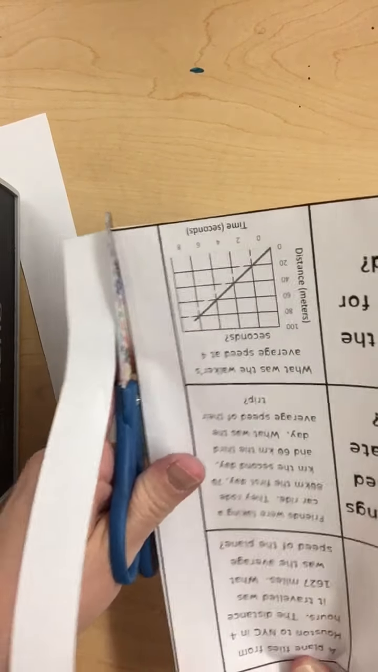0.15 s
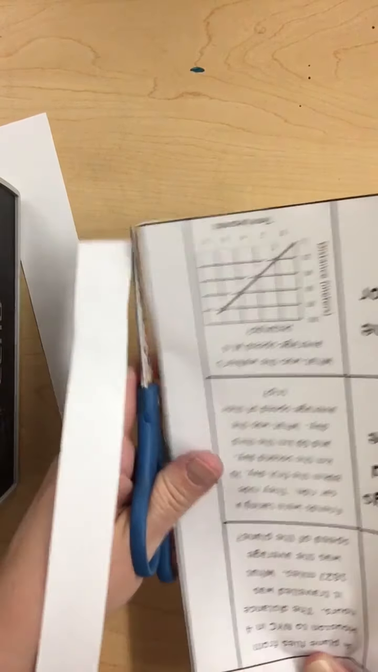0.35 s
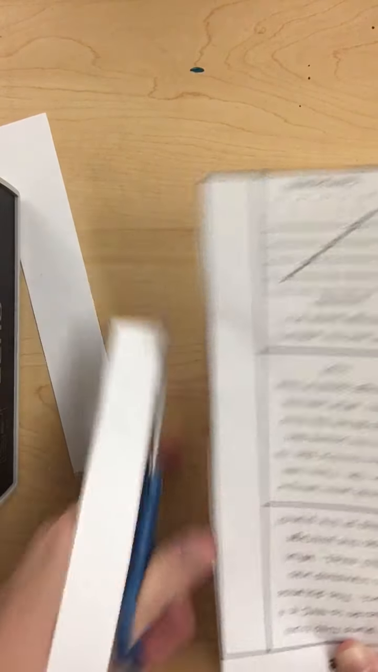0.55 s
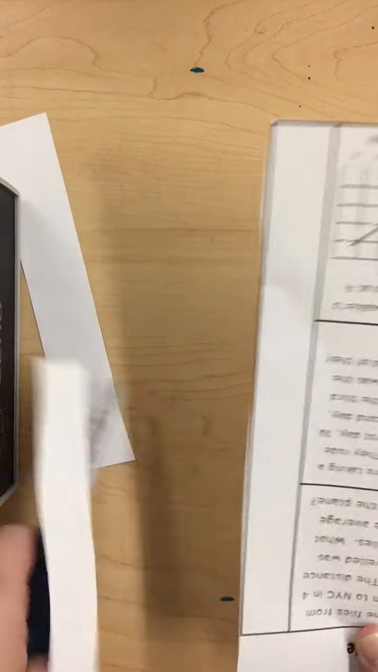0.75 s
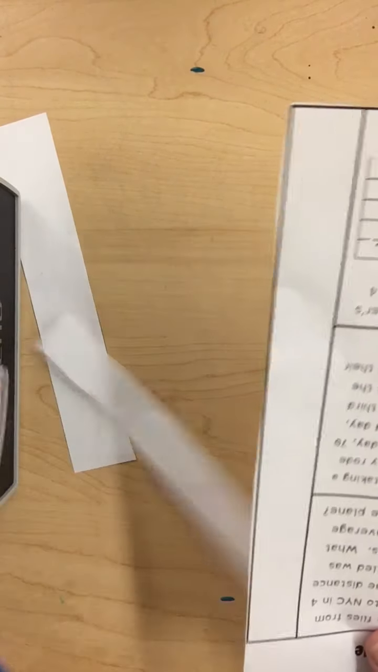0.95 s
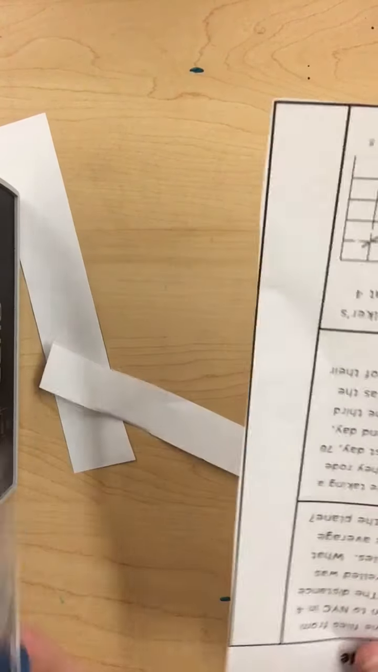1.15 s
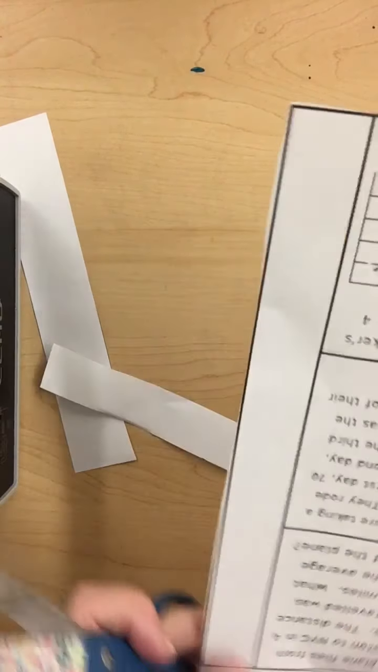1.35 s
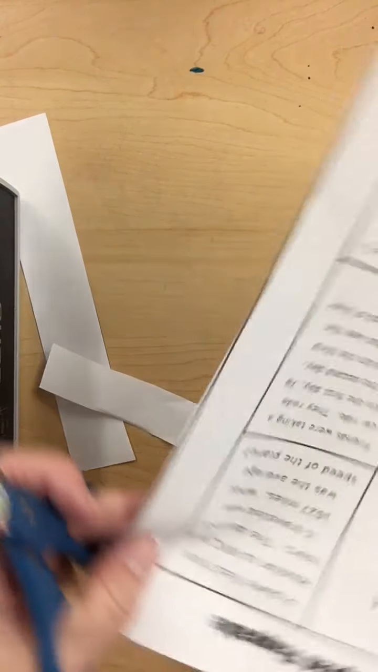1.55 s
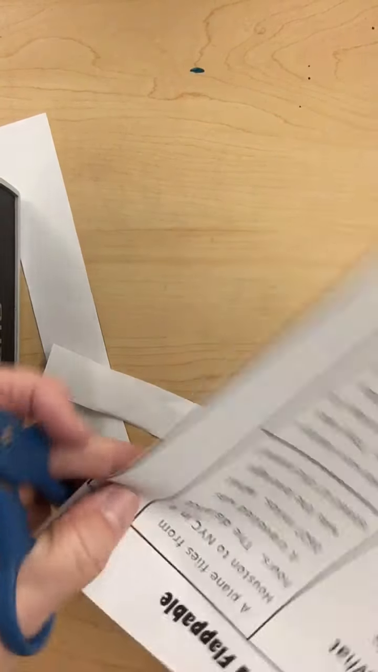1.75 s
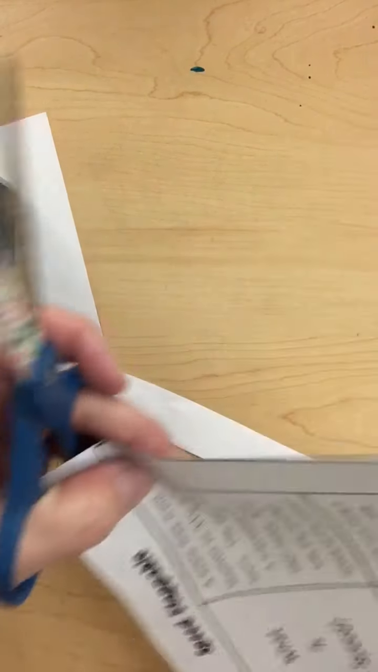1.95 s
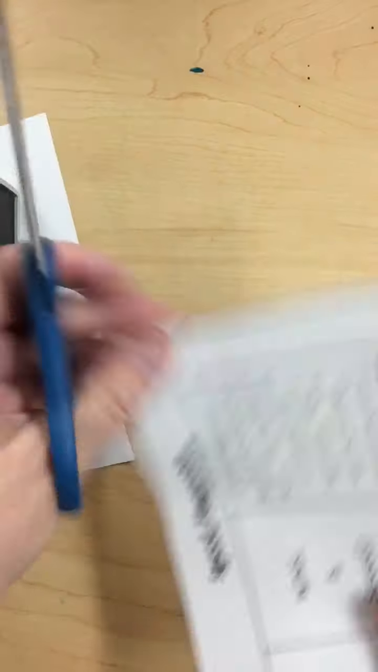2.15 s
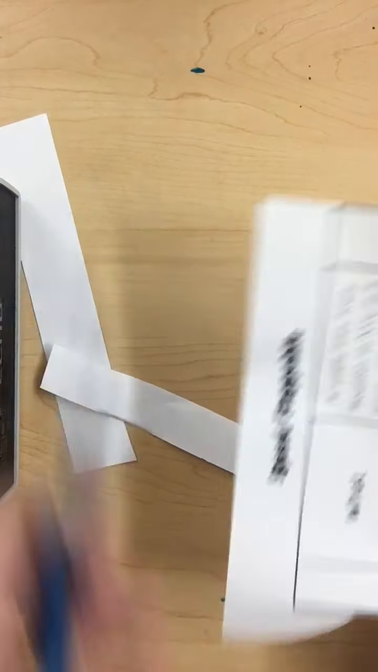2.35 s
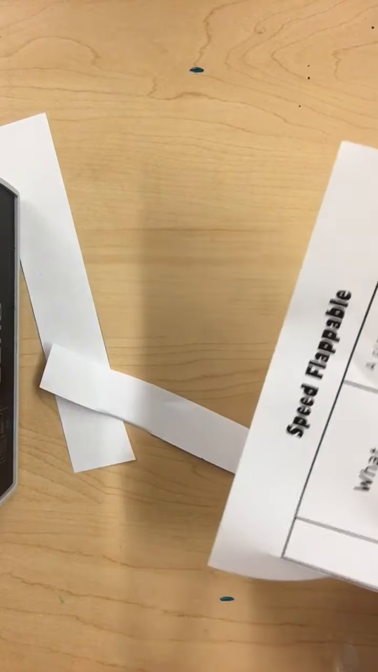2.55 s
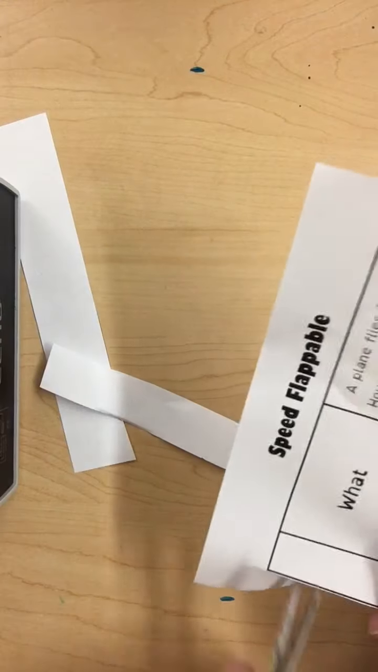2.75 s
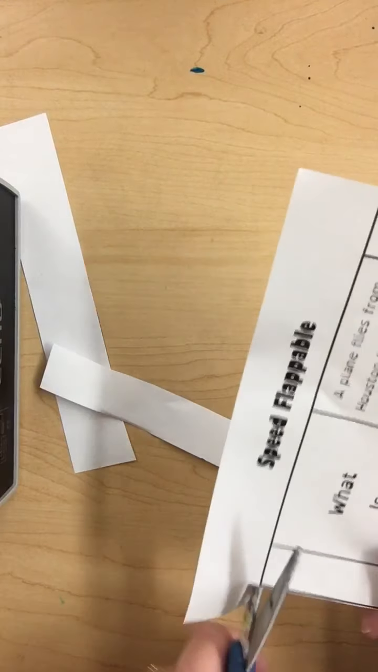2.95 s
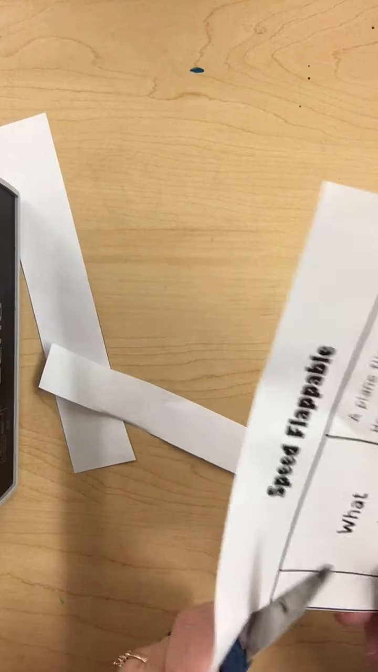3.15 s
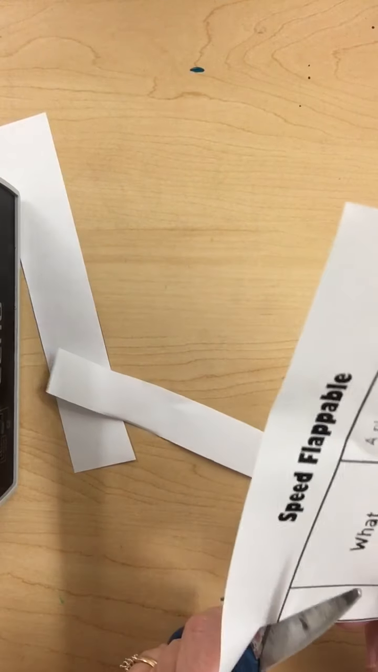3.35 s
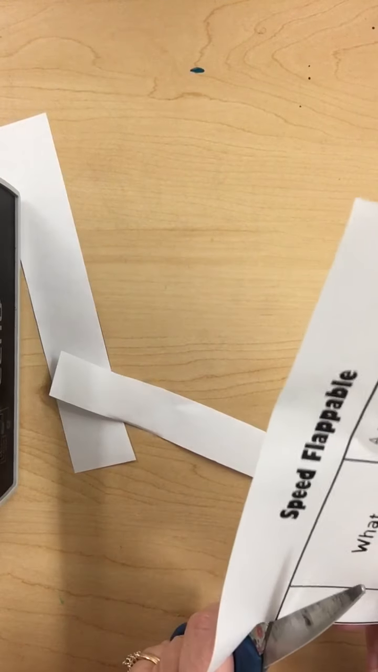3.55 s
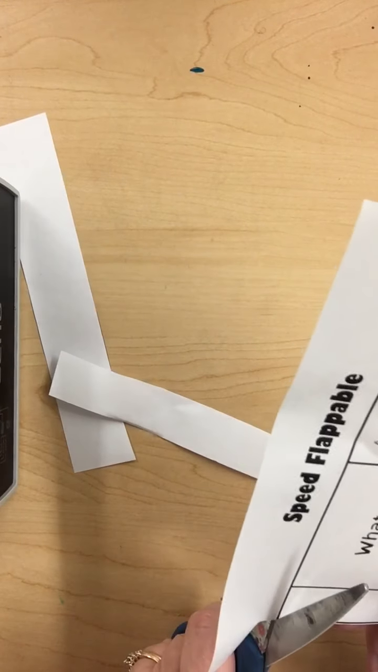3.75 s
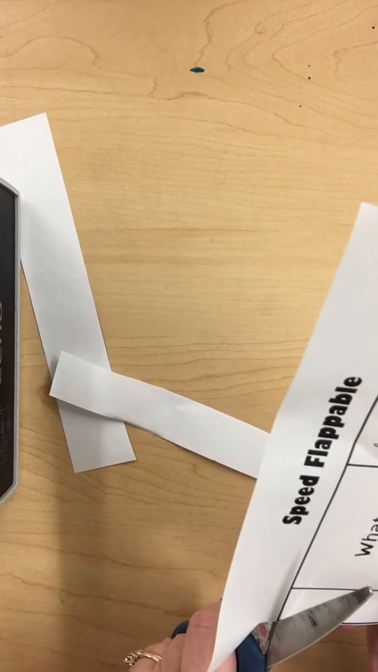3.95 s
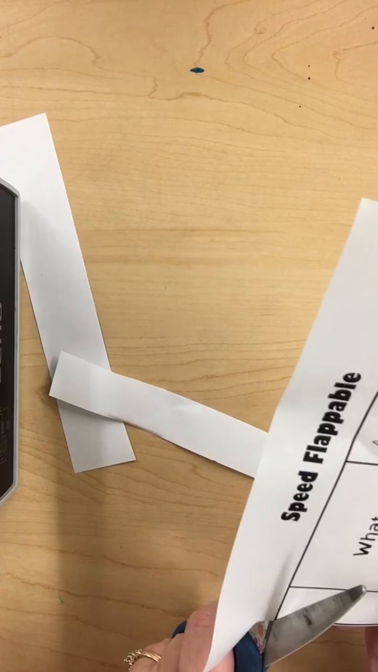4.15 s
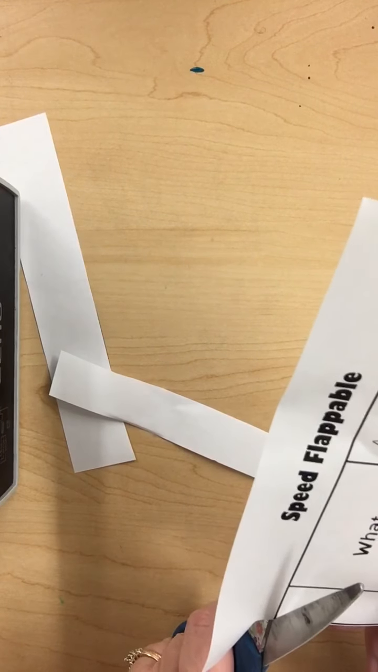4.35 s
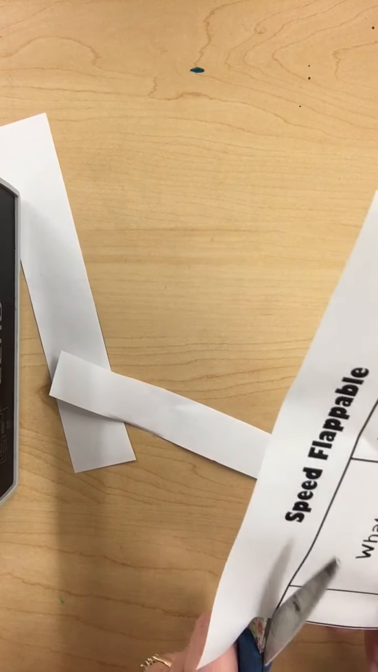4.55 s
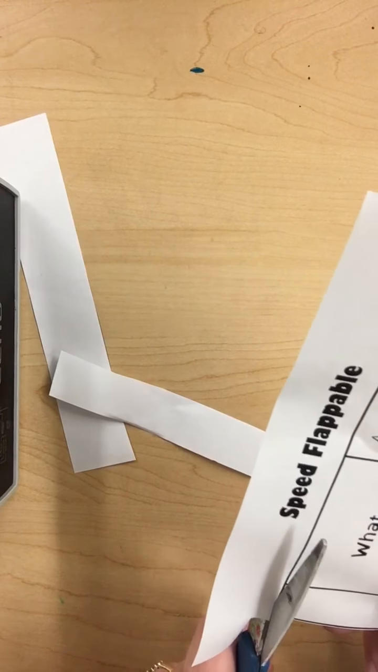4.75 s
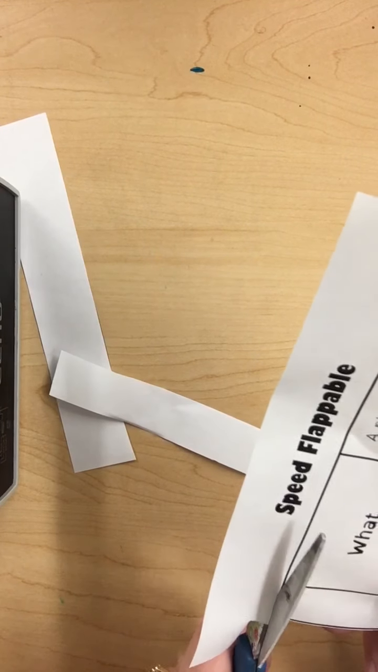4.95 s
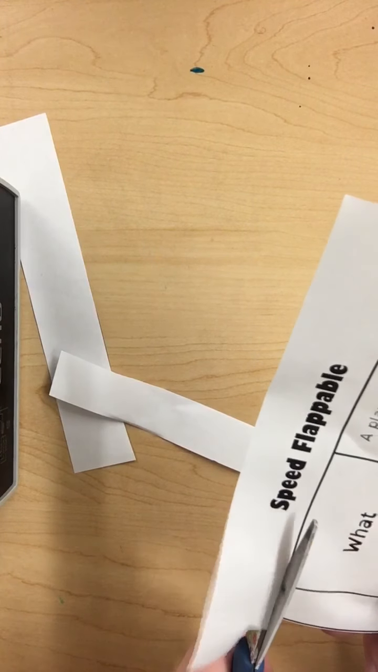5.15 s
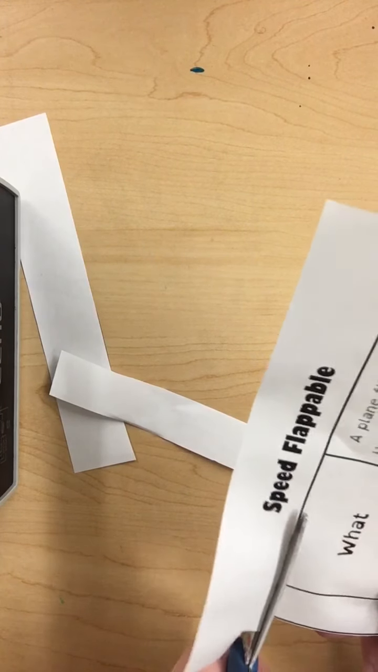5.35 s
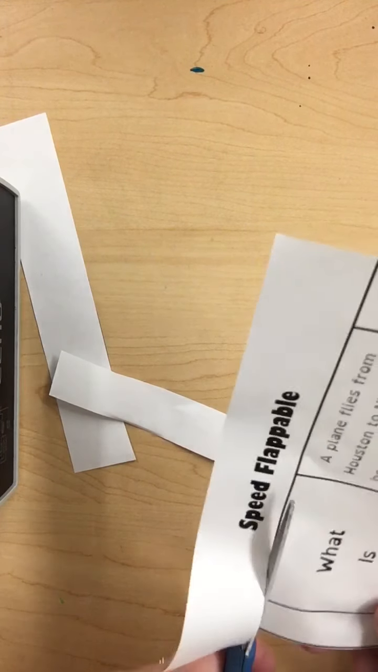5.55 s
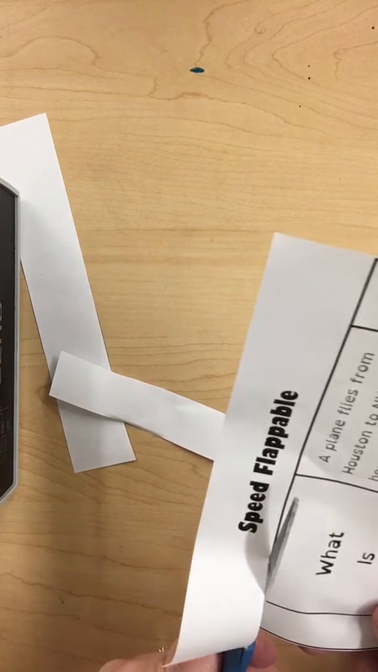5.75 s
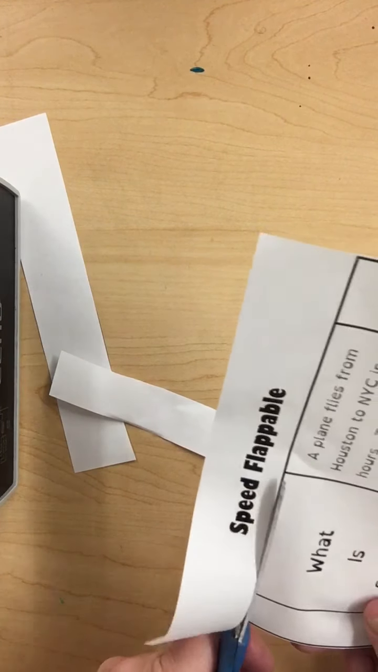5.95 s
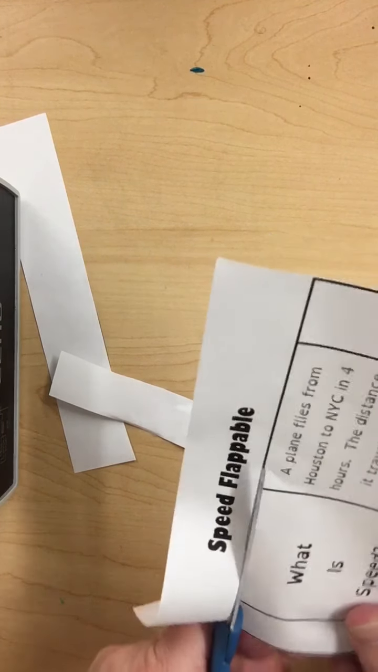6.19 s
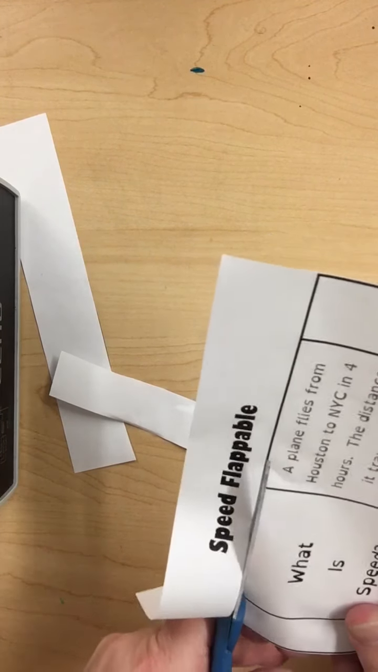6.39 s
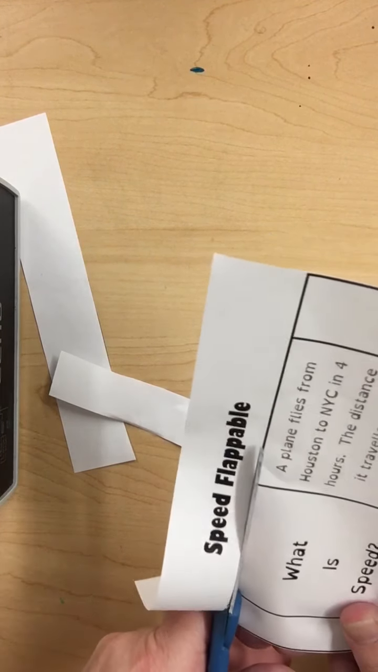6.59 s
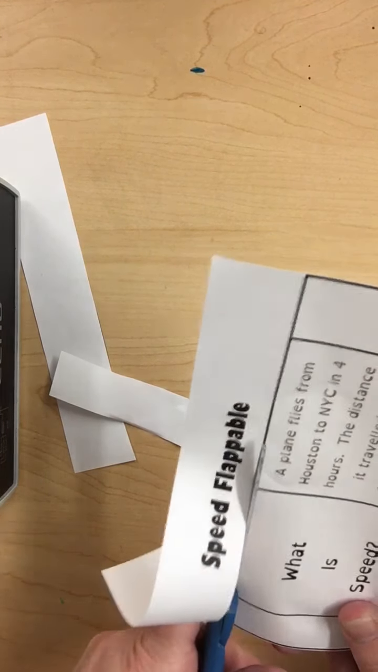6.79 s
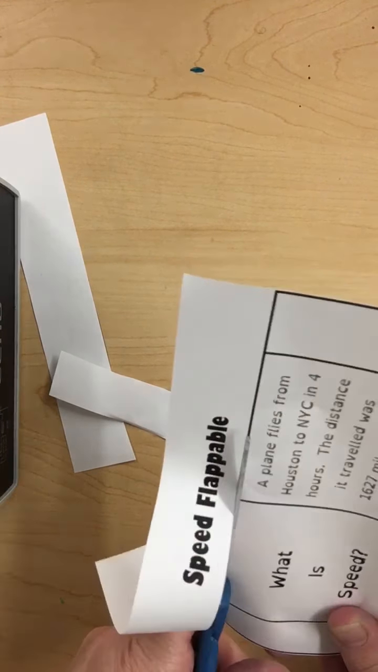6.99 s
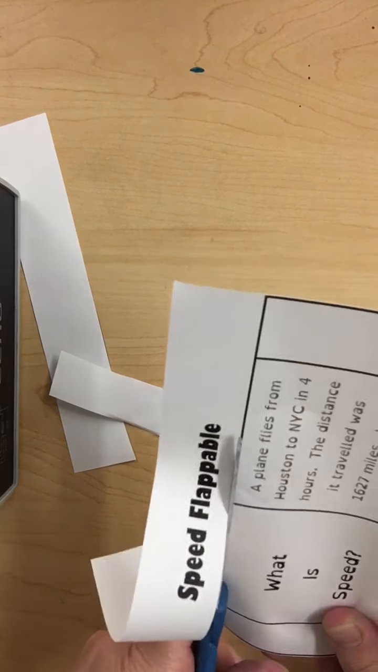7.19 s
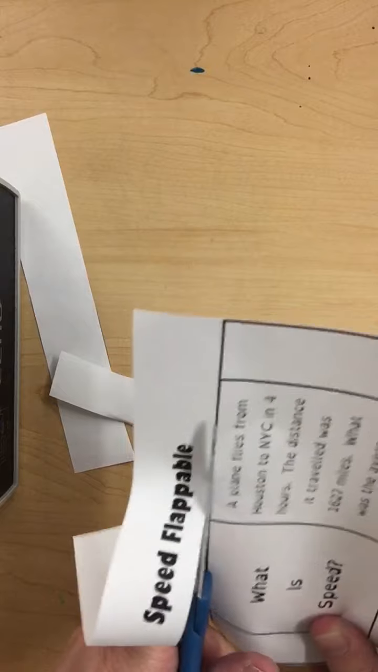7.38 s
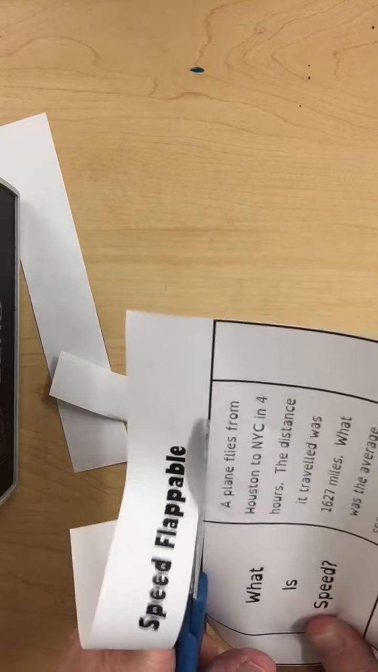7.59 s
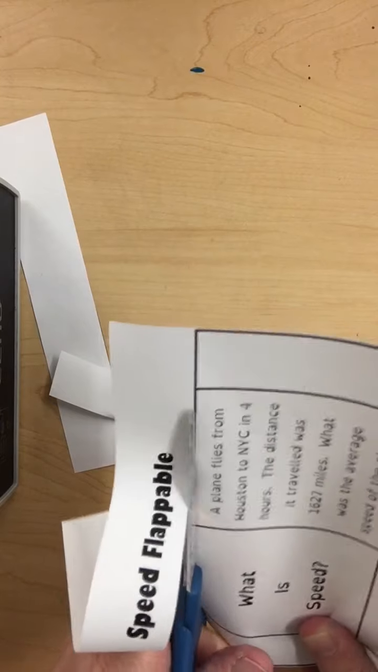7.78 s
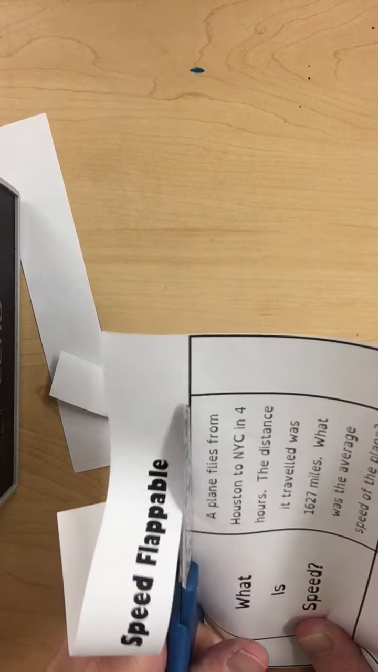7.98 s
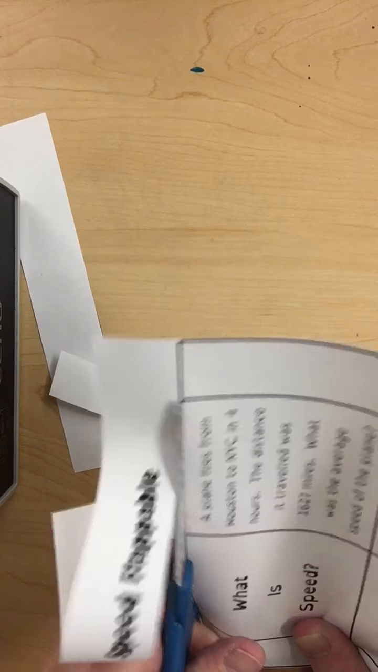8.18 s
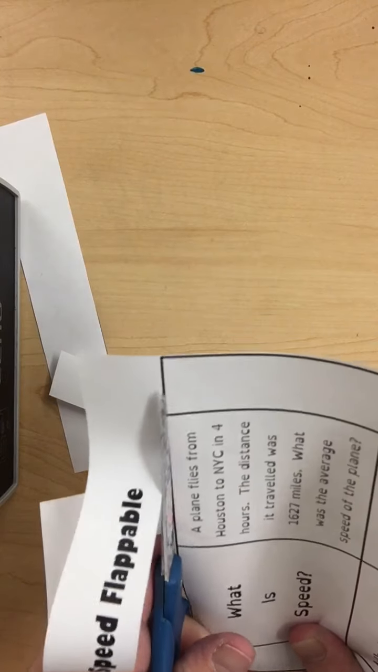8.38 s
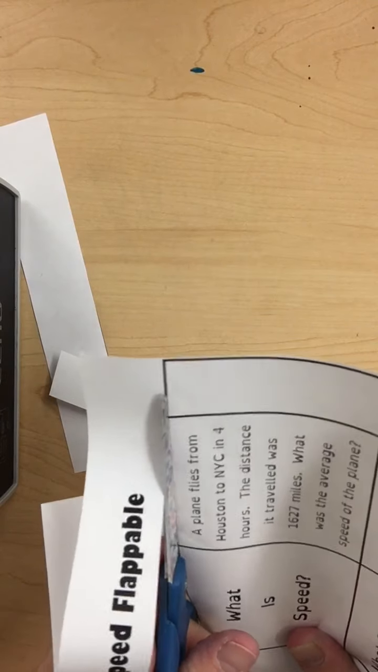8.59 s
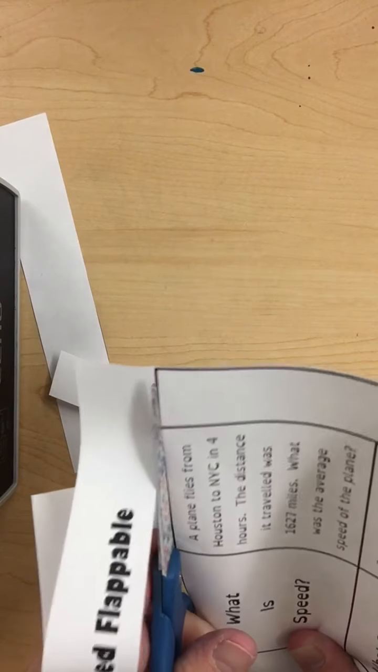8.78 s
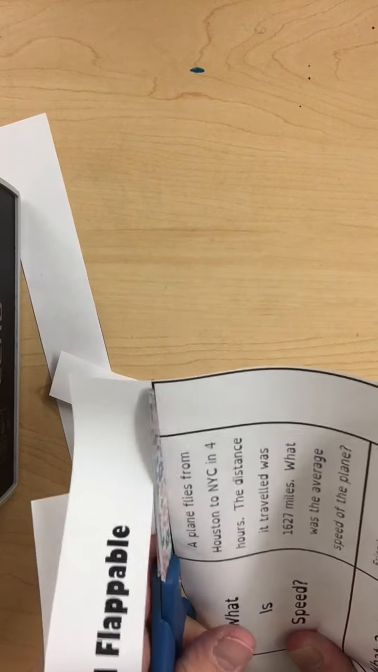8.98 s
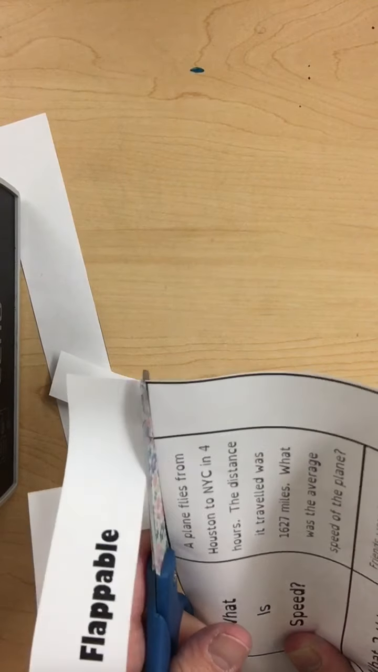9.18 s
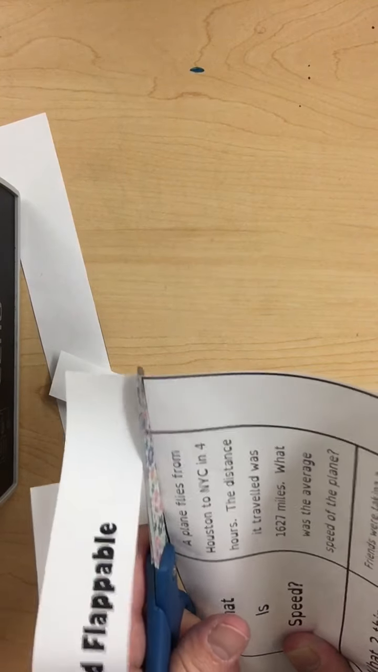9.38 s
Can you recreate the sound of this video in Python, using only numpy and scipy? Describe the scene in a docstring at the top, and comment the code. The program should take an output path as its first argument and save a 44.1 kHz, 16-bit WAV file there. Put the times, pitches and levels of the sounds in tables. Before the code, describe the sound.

Close, dry paper handling over a wooden desk: light snips, rustling and a few flaps, then a quick rhythmic series of scissor cuts with small pops.

```python
"""Scissors finish a strip of paper over a wooden desk; the sheet is turned, the blades slide in and make eight quick cuts.
Closing blades snap a dense run of fibres that the sheet radiates; reopening, they stick and slip along the cut edge.
Around this the sheet swishes, flexes and pops in the hand, blades and paper edge tick, and the hand bumps the desk.
The small room answers with a short tail over quiet ventilation and hum; both channels are the same."""
import sys
import numpy as np
from scipy import signal
from scipy.fft import rfft, irfft, next_fast_len
from scipy.io import wavfile
from scipy.ndimage import map_coordinates

SR = 44100
rng = np.random.default_rng(int(sys.argv[2]) if len(sys.argv) > 2 else 0)


def materialize(psi):
    """Save the field psi as 16-bit PCM at rate SR to the path in sys.argv[1].

    A 1-D psi becomes a single channel; in a 2-D psi each row is a channel.
    """
    bounded = np.clip(np.atleast_2d(psi).T, -1, 1)
    quanta = np.round(bounded * 32767).astype(np.int16)
    wavfile.write(sys.argv[1], SR, quanta)


N = 415846
T = np.arange(N) / SR

# closing strokes; the third cut takes two pushes, and the sheet rings differently at each:
# (start [s], length [s], first level [dB], last level [dB], mid-stroke swell [dB], first resonance [Hz],
#  last resonance [Hz], resonance gain at the start [dB], bass [dB], treble [dB], top octave [dB])
CLOSINGS = [(5.396, 0.2, -31.5, -37.5, 2, 940, 990, 4, 1, -2, -3),
            (6.061, 0.21, -30.5, -46.5, 2.5, 2130, 2450, 4.5, 3.5, 5.5, -2.5),
            (6.713, 0.086, -35.5, -36.5, -1, 3300, 4100, 5.5, 0, 4.5, 0),
            (6.802, 0.14, -32.5, -44, 6, 3300, 3700, 10.5, -1, 5, 0),
            (7.255, 0.16, -33.5, -35.5, 4.5, 3560, 3550, 12.5, -7.5, 2.5, 0),
            (7.734, 0.15, -29.5, -37.5, -2.5, 1740, 1370, 8, -1, 5.5, -2),
            (8.169, 0.18, -31.5, -34.5, 1.5, 1760, 1590, 14, -11, 9, -1),
            (8.648, 0.16, -32.5, -40.5, 1.5, 1840, 1540, 11, -17, 9, -4),
            (9.09, 0.052, -35, -39, 10, 1080, 1090, 1, -12, 3.5, -7)]
# tone of the cut edge rubbing on steel: (frequency [Hz], gain [dB])
EDGE_TONE = [(40, -23.5), (150, -20), (430, -13), (800, 0), (1650, -3), (3400, -2.5), (4500, -6),
             (5700, -8), (8300, -22), (16000, -31.5)]
# tone of the bending sheet: (frequency [Hz], gain [dB])
FLEX_TONE = [(60, -26), (400, -15), (850, -1), (1250, 0.5), (1900, -3.5), (3000, -17), (7000, -31),
             (16000, -45)]
# colour of the sheet where the blades touch it: (time [s], resonance [Hz], sharpness of the rasp [dB])
TOUCH_TONE = [(.25, 1400, -3.5), (2.9, 3430, -4), (4.5, 2330, -1), (5.2, 2500, 0), (7.1, 2200, 3),
              (7.6, 2150, -1.5), (8.4, 2000, -1)]
BITE_S = .007  # the blades bite within this time


def amp(db):
    """Decibels to gain."""
    return 10 ** (np.asarray(db) / 20)


def unit(x):
    """Scale to rms 1."""
    return x / np.sqrt(np.mean(x ** 2) + 1e-20)


def along(points, hz):
    """Read (Hz, value) points on a log frequency axis."""
    f, v = np.transpose(points)
    return np.interp(np.log(hz + 1), np.log(f + 1), v)


def bell(hz, centre_hz, width_hz):
    """Bell of height 1 around a resonance; it halves one width away."""
    return 1 / (1 + ((hz - centre_hz) / width_hz) ** 2)


def wobble(rate, size):
    """A smooth random curve, rate knots a second."""
    knots = rng.standard_normal(int(size * rate / SR) + 4)
    return map_coordinates(knots, [np.arange(size) * rate / SR])


def add(track, s, sound):
    """Mix a sound into a track from time s."""
    i = max(round(s * SR), 0)
    track[i:i + len(sound)] += sound[:max(N - i, 0)]


def colour(x, db_of_hz):
    """Causal (minimum-phase) filter with the given gain, so that every snap rings after it strikes."""
    m = 2 * next_fast_len(len(x) // 2 + 2048)
    cepstrum = irfft(np.log(amp(db_of_hz(np.fft.rfftfreq(m, 1 / SR))) + 1e-6))
    # fold the cepstrum onto positive times: nothing sounds before its cause
    cepstrum[1:m // 2] *= 2
    cepstrum[m // 2 + 1:] = 0
    return irfft(rfft(x, m) * np.exp(rfft(cepstrum)), m)[:len(x)]


def stroke(s, length, first_db, last_db, swell_db, attack, release):
    """Force of one hand movement: a quick rise, an arched slope between two levels, then a decay (release = t60)."""
    force = np.zeros(N)
    t = np.arange(int((length + release) * SR)) / SR
    done = np.minimum(t / length, 1)
    db = first_db + (last_db - first_db) * done + swell_db * np.sin(np.pi * done)
    rise = np.minimum(t / attack, 1)
    fade = 10 ** (-3 * np.maximum(t - length, 0) / release)
    add(force, s, amp(db) * rise * fade)
    return force


def sheet_modes(hz, spacing_hz):
    """Close random peaks and dips of a sheet bent into a new shape."""
    return map_coordinates(rng.standard_normal(1024), [hz / spacing_hz], mode="mirror")


def scatter(x):
    """A snap crosses the sheet as bending waves: each frequency arrives after its own short delay."""
    spread_s, span_hz = .001, 260  # typical delay, and the frequency span over which it changes
    m = next_fast_len(len(x) + 1024)
    delay = spread_s * np.abs(sheet_modes(np.fft.rfftfreq(m, 1 / SR), span_hz))
    # delay at each frequency is the slope of the phase, so sum it up
    phase = 2 * np.pi * np.cumsum(delay) * SR / m
    return irfft(rfft(x, m) * np.exp(-1j * phase), m)[:len(x)]


def crackle(rate, spread_db, smooth, size):
    """Fibre snaps of uneven size at random moments, over smooth friction noise."""
    struck = rng.random(size) < rate / SR
    snaps = struck * rng.choice([-1, 1], size) * amp(spread_db * rng.standard_normal(size))
    return unit(unit(scatter(snaps)) + smooth * rng.standard_normal(size))


def tears(rate, size):
    """The blades part one fibre bundle after another, at loosely even steps, over dense friction."""
    grit_db, friction_gain = 2.2, .55  # scatter of snap sizes; friction noise against the snaps
    steps = rng.gamma(4, SR / rate / 4, size // 8)
    at = np.cumsum(steps).astype(int)
    at = at[at < size]
    sizes = rng.choice([-1, 1], len(at)) * amp(grit_db * rng.standard_normal(len(at)))
    snaps = np.bincount(at, sizes, size)
    return unit(unit(scatter(snaps)) + friction_gain * rng.standard_normal(size))


def bend(x, depth_db, span_hz, seconds, extra_db=None):
    """A bending sheet's close resonances swell and fade in patches (extra_db: gain by frequency and progress)."""
    hz, t, z = signal.stft(x, SR, nperseg=512)
    knots = np.meshgrid(hz / span_hz, t / seconds, indexing="ij")
    patches = rng.standard_normal([int(k.max()) + 2 for k in knots])
    db = depth_db * map_coordinates(patches, knots, order=2)
    if extra_db:
        db = db + extra_db(hz[:, None], t / t[-1])
    return signal.istft(z * amp(db), SR, nperseg=512)[1][:len(x)]


def room_tone():
    """Ventilation is steady noise shaped by frequency; a faint mains hum is one sine."""
    # ventilation tone: (frequency [Hz], gain [dB])
    air_tone = [(20, -31.5), (40, -7.5), (62, 0.5), (110, -5.5), (200, -7), (340, -11.5), (1170, -18),
                (1700, -25), (7800, -35), (16000, -49.5)]
    air_db, hum_db, hum_hz = -68.5, -74.5, 120
    air = unit(colour(rng.standard_normal(N), lambda hz: along(air_tone, hz)))
    return amp(air_db) * air + amp(hum_db) * np.sin(2 * np.pi * hum_hz * T)


def room(x):
    """The walls answer with a short diffuse tail: noise that dies at a different speed in each band."""
    # (frequency [Hz], t60: time to fall by 60 dB [s])
    fade_times = [(150, 0.61), (1000, 0.13), (5000, 0.077), (15000, 0.068)]
    hz, t, z = signal.stft(rng.standard_normal(SR // 2), SR, nperseg=256)
    fade = amp(-60 * t / along(fade_times, hz)[:, None])
    tail = signal.istft(z * fade, SR, nperseg=256)[1]
    late = np.pad(tail, (SR // 200, 0))  # the answer starts 5 ms late
    return signal.fftconvolve(x, late / np.linalg.norm(tail))[:N]


def bumps():
    """The hand bumps the desk: one low, quickly damped ring."""
    # (start [s], level [dB], ring [Hz])
    desk_bumps = [(2.419, -52, 172), (2.665, -50.5, 294)]
    fade_s = 0.07  # t60
    out, t = np.zeros(N), np.arange(SR // 5) / SR
    for s, db, hz in desk_bumps:
        onset = 1 - np.exp(-t * hz)
        add(out, s, amp(db - 60 * t / fade_s) * np.sin(2 * np.pi * hz * t) * onset)
    return out


def friction(db_of_hz, rate, smooth, uneven_db, extra_db=None):
    """Light rubbing: unevenly strong grains of crackle, coloured, then shaped by the bending sheet."""
    grains = crackle(rate, spread_db=2.5, smooth=smooth, size=N) * amp(uneven_db * wobble(110, size=N))
    return unit(bend(colour(grains, db_of_hz), depth_db=3.5, span_hz=360, seconds=.04, extra_db=extra_db))


def swishes():
    """Paper sliding through the hand and over the desk: hiss, clumped crinkles and a dull rub."""
    # (start [s], length [s], first level [dB], last level [dB], swell [dB], dull rub over hiss [dB])
    slides = [(0.28, 0.45, -67, -71, 5.5, -7), (0.693, 0.12, -62.5, -59.5, 0.5, -19),
              (0.966, 0.49, -67.5, -74.5, 3.5, -3), (1.369, 0.16, -58, -66.5, 1.5, 1),
              (1.551, 0.38, -63, -61, 0.5, -5.5), (1.914, 0.33, -64.5, -62.5, 9.5, -2),
              (2.231, 0.11, -62.5, -55.5, 3, -10), (2.353, 0.2, -67.5, -85, 10, -3.5),
              (2.659, 0.23, -60, -61, -1.5, -5.5), (2.83, 0.21, -51, -57, -7, -3.5)]
    # tones of the dull rub and of the hiss: (frequency [Hz], gain [dB])
    rub_tone = [(60, -27), (400, 3), (900, 6), (2200, 7), (4000, -8), (8000, -26)]
    hiss_tone = [(1000, -37), (2500, 6.5), (4200, 5), (6500, 1), (8500, -9), (16000, -17.5)]
    attack_s, release_s = 0.0058, 0.091  # rise and t60
    rub = friction(lambda hz: along(rub_tone, hz), rate=1300, smooth=0.7, uneven_db=2.5)
    hiss = friction(lambda hz: along(hiss_tone, hz), rate=800, smooth=0.5, uneven_db=2.4)
    crinkles = friction(lambda hz: along(EDGE_TONE, hz), rate=810, smooth=0.59, uneven_db=5)
    # crinkles come in clumps; -6.5 + 1.5 dB is their usual level against the hiss
    crinkles = amp(-6.5) * amp(2.6 * wobble(20, size=N) + 1.5) * crinkles
    out = np.zeros(N)
    for *movement, rub_db in slides:
        out += stroke(*movement, attack_s, release_s) * (hiss + crinkles + amp(rub_db) * rub)
    return out


def chatter():
    """Fine chatter of steel on paper: a held sheet rustles, open blades brush it, and it rustles with each cut."""
    # faint rustle of the held sheet: (time [s], level [dB])
    held = [(0, -65), (2.5, -68.5), (4.4, -78.5), (5.35, -61.5), (6.5, -66), (9.43, -68)]
    # open blades brushing the sheet: (start [s], length [s], first level [dB], last level [dB], swell [dB])
    brushes = [(2.832, 0.25, -46, -52, -1), (3.084, 0.29, -64, -73, 10), (3.377, 0.084, -56, -61, 3),
               (4.474, 0.11, -53.5, -54, 5), (6.619, 0.1, -54.5, -50, 1.5)]
    brush_attack_s, brush_release_s = 0.005, 0.018  # rise and t60
    settle_db, settle_s = -15.5, 0.09  # rustle against the cut's level, then its t60
    contact = amp(np.interp(T, *np.transpose(held)))
    for brush in brushes:
        contact += stroke(*brush, brush_attack_s, brush_release_s)
    for cut in CLOSINGS:
        contact += amp(settle_db) * stroke(*cut[:5], BITE_S, settle_s)

    def steel(hz):
        # a light touch on the edge is brighter than a slip
        return along(EDGE_TONE, hz) + along([(800, 0.0), (2000, 3.0), (4000, 1.5), (12000, 6)], hz)

    def ring(hz, progress):
        times, rings_hz, _ = np.transpose(TOUCH_TONE)
        return 4 * bell(hz, np.interp(progress * T[-1], times, rings_hz), 900)

    return contact * friction(steel, rate=900, smooth=.45, uneven_db=2, extra_db=ring)


def flexes():
    """Bending paper gives dull, swelling flaps with a little crackle on top."""
    # (middle [s], half width [s], level [dB], brightness around 3.1 kHz [dB])
    bends = [(.119, 0.0032, -34, 4), (.258, 0.0071, -29, 10), (.295, 0.0045, -36.5, 11),
             (.474, 0.033, -51.5, 16), (.523, 0.0038, -40.5, 8), (.574, 0.0026, -40.5, 7),
             (1.39, 0.01, -46.5, -11), (1.77, 0.0065, -45.5, 20), (2.097, 0.0028, -41.5, 2),
             (2.124, 0.0033, -35, 15), (2.155, 0.0086, -33, 12), (2.185, .002, -38, 6),
             (2.199, 0.0036, -34, 21), (2.574, .009, -59.5, 27), (2.70, 0.0072, -52, 2),
             (3.068, 0.0072, -46.5, -4), (3.227, 0.0088, -49.5, -1), (3.309, .0033, -54.5, -3),
             (3.946, 0.014, -63.5, 22)]
    crisp_db = -16  # crackle of creases against the flap
    out = np.zeros(N)
    for s, width, db, bright_db in bends:
        reach = int(4 * width * SR)
        t = np.arange(-reach, reach) / SR
        swell = 1 / np.cosh(1.07 * t / width)
        flap = colour(swell * crackle(rate=1800, spread_db=1.5, smooth=0.22, size=len(t)),
                      lambda hz: along(FLEX_TONE, hz) + bright_db * bell(hz, 3100, 900))
        creases = colour(swell * crackle(rate=1600, spread_db=19.0, smooth=0.12, size=len(t)),
                         lambda hz: along(EDGE_TONE, hz))
        both = unit(flap) + amp(crisp_db) * unit(creases)
        add(out, s + t[0], amp(db) * both * np.sqrt(np.mean(swell ** 2)))
    return out


def pops():
    """A buckle snaps through: a few cycles that sag in pitch, then a short shiver of the sheet."""
    # (start [s], level [dB], pitch halfway through [Hz], length [s])
    buckles = [(2.135, -29.5, 930, 0.003), (5.3316, -23.5, 950, 0.0039), (5.8003, -13.5, 1144, 0.0044),
               (6.444, -22, 1820, 0.00163), (8.382, -35, 970, 0.0032)]
    shiver_db, shiver_s = -0.5, 0.023  # shiver against the snap, and its t60
    out, t = np.zeros(N), np.arange(int(.06 * SR)) / SR
    for s, db, ring_hz, length in buckles:
        done = np.minimum(t / length, 1)
        phase = 2 * np.pi * np.cumsum(ring_hz * (1 - 0.17 * (done - .5))) / SR
        snap = (np.sin(phase) - 0.38 * np.cos(2 * phase)) * np.sin(np.pi * done)
        noise = unit(colour(rng.standard_normal(len(t)), lambda hz: along(FLEX_TONE, hz)))
        shiver = noise * done * amp(-60 * t / shiver_s)
        add(out, s, amp(db) * (snap + amp(shiver_db) * shiver))
    return out


def ticks():
    """Sharp contacts of blade and paper edge: bursts of bright noise that die within milliseconds."""
    # (start [s], peak level [dB], top octave [dB], to which 16.5 dB is added)
    contacts = [(.258, -18, -22), (.637, -35.5, -14), (0.864, -40.5, -14), (0.982, -37.5, -4),
                (1.172, -35.5, -4), (1.343, -46, -4), (2.031, -39, -5), (2.679, -33.5, -1.5),
                (2.738, -44, -1), (5.239, -21.5, -24), (5.830, -29, -14), (6.518, -28, -28),
                (6.823, -21.5, -33), (7.074, -20.5, -27), (7.405, -29, -15)]
    # (frequency [Hz], gain [dB])
    tick_tone = [(200, -15), (1200, -15), (3800, -1.5), (6200, -1), (8500, -16), (16000, -35)]
    out, t = np.zeros(N), np.arange(int(.03 * SR)) / SR
    for s, db, top_db in contacts:
        blow = rng.standard_normal(len(t)) * amp(-60 * t / .012)  # t60 of 12 ms
        top = [(6500, 0), (10000, top_db + 16.5)]
        tick = colour(blow, lambda hz: along(tick_tone, hz) + along(top, hz))
        add(out, s, amp(db) * tick / np.abs(tick).max())
    return out


def rasp(force, s):
    """The blade judders over the cut edge; the sheet rings where it is touched at time s, anew with each call."""
    times, rings_hz, edges_db = np.transpose(TOUCH_TONE)
    ring_hz, edge_db = np.interp(s, times, rings_hz), np.interp(s, times, edges_db)

    def body(hz):
        return along(EDGE_TONE, hz) + 7 * bell(hz, ring_hz, 300) + edge_db * bell(hz, 4200, 1000)

    judder = amp(1.5 * wobble(212.6, size=len(force)))
    grains = bend(tears(rate=550, size=len(force)), depth_db=3.2, span_hz=260, seconds=.018)
    return unit(colour(force * judder * grains, body)) * np.sqrt(np.mean(force ** 2))


def slips():
    """Blades sliding in or reopening stick and let go in nearly even trains; slips listed singly are one rasp each."""
    # (start [s], length [s], first level [dB], last level [dB], swell [dB], slips per second [1/s],
    #  level change while stuck [dB])
    openings = [(4.586, 0.3, -56, -54.5, 3.5, 75, -7.5), (4.9, 0.17, -51.5, -45.5, -4, 64, -12),
                (5.078, 0.16, -45, -39.5, 1.5, 54.5, -12), (5.794, 0.097, -33.5, -40, -1.5, 34, -6),
                (6.441, 0.068, -34.5, -35.5, -1.5, 67, -10.5), (7.068, 0.059, -29, -38, -1.5, 29, -13),
                (7.542, 0.061, -33.5, -36.5, -3, 26, -15), (7.988, 0.039, -48.5, -42.5, 5, 73, 0.5),
                (8.423, 0.097, -39, -35.5, 3.5, 54, -20.5), (8.939, 0.041, -37.5, -40.5, 3.5, 60, -6),
                (9.362, 0.058, -38, -49.5, -1.5, 80, -22)]
    # single blade slips and light touches on the cut edge: (start [s], length [s], level [dB])
    single_slips = [(0.012, 0.0078, -38), (0.059, 0.016, -44), (0.082, .004, -42.5), (0.131, 0.0083, -37.5),
                    (0.17, 0.004, -36), (0.186, 0.01, -46), (0.203, 0.0052, -37.5), (0.214, .004, -41),
                    (0.229, 0.011, -37), (1.163, 0.019, -55), (4.107, 0.011, -61.5), (4.163, 0.0086, -56),
                    (4.489, 0.025, -46.5), (5.249, 0.0087, -32), (5.271, 0.0081, -35),
                    (5.292, 0.0049, -33.5), (5.899, 0.011, -38), (5.92, 0.021, -34.5), (5.95, 0.02, -48.5),
                    (6.018, 0.0022, -46), (6.514, 0.019, -36), (6.541, .011, -37.5), (6.604, 0.0042, -36.5),
                    (6.679, 0.0076, -37), (6.937, 0.028, -33), (7.134, 0.0091, -42), (7.157, 0.014, -43),
                    (7.524, 0.016, -46.5), (7.608, 0.011, -42.5), (7.906, 0.0077, -36.5),
                    (8.039, 0.0041, -33), (8.048, 0.028, -36), (8.395, 0.0069, -46.5),
                    (8.904, 0.022, -49.5), (8.923, 0.0068, -33), (8.99, 0.0049, -31), (9.3, 0.022, -52),
                    (9.324, 0.024, -39.5)]
    slip_share, jitter = .5, .035  # the slip is over by this part of a cycle; timing scatter [cycles]
    attack_s, release_s = 0.0027, 0.022  # rise and t60
    lead_s, lead_db = .02, -11.5  # the blades graze the edge, growing louder, just before they grip
    out = np.zeros(N)
    for s, length, first_db, last_db, swell_db, rate, stuck_db in openings:
        force = np.trim_zeros(stroke(s, length, first_db, last_db, swell_db, attack_s, release_s))
        cycle = (rate * np.arange(len(force)) / SR + jitter * wobble(31, size=len(force))) % 1
        stuck = np.interp(cycle, [0, .15, slip_share, 1], [1, 0, 0, 1])
        add(out, s, amp(stuck_db * stuck) * rasp(force, s))
        graze = np.linspace(0, amp(first_db + lead_db), int(lead_s * SR))
        add(out, s - lead_s, rasp(graze, s))
    for s, length, db in single_slips:
        force = np.trim_zeros(stroke(s, length, db, db, 0, attack_s, release_s))
        add(out, s, rasp(force, s))
    return out


def cuts():
    """Each closing stroke shears a dense run of fibres; the sheet around the blades colours them."""
    # tone of the torn fibres: (frequency [Hz], gain [dB])
    fibre_tone = [(40, -21), (150, -14.5), (430, -12), (820, 4.5), (1400, -1.5), (2100, 4), (3300, -2),
                  (4500, -3.5), (5700, -12), (8000, -25), (10000, -30), (16000, -32)]
    release_s = .08  # t60 once the blades stop
    out = np.zeros(N)
    for *movement, first_hz, last_hz, ring_db, bass_db, treble_db, top_db in CLOSINGS:
        force = stroke(*movement, BITE_S, release_s)
        on = np.flatnonzero(force)
        clumps = wobble(149.9, size=len(on))
        fibres = amp(clumps) * tears(rate=480, size=len(on))
        # tough clumps of fibre part with an extra bright crack
        cracks = amp(2.2 * clumps - 9) * crackle(rate=550, spread_db=2.5, smooth=0, size=len(on))
        cracks = colour(cracks, lambda hz: along([(1500, -5.5), (7000, 9.0)], hz))
        tilt = [(500, bass_db), (1200, 0), (3500, 0), (9000, treble_db), (13000, treble_db + top_db)]
        body = colour(fibres + cracks, lambda hz: along(fibre_tone, hz) + along(tilt, hz))

        def ring(hz, closed):
            # the resonance glides and weakens as the cutting point runs toward the tips
            centre_hz = first_hz + (last_hz - first_hz) * closed
            return ring_db * (1 - closed / 2) * bell(hz, centre_hz, 0.13 * first_hz)

        sheet = unit(bend(body, depth_db=3.4, span_hz=190, seconds=.035, extra_db=ring))
        out[on] += force[on] * sheet
    return out


def scene():
    """Scissors and paper close by, the room far behind, the same in both channels."""
    # narrow dips and peaks that the surroundings put in everything near:
    # (frequency [Hz], half width [Hz], gain [dB])
    dips = [(1683, 167, -2.5), (2873, 256, -8.5), (4600, 100, 4.5), (4865, 236, -8)]
    near = bumps() + swishes() + chatter() + flexes() + pops() + ticks() + slips() + cuts()
    near = colour(near, lambda hz: sum(db * bell(hz, dip_hz, width_hz) for dip_hz, width_hz, db in dips))
    mono = near + amp(-17.5) * room(near) + room_tone()
    return np.array([mono, mono])


def record(dry):
    """The recorder keeps nothing above its band limit."""
    top_hz = 15850
    m = next_fast_len(N + SR // 2)
    kept = np.fft.rfftfreq(m, 1 / SR) < top_hz
    return irfft(rfft(dry, m) * kept, m)[:, :N]


dry = scene()
out = record(dry)
materialize(out)
```